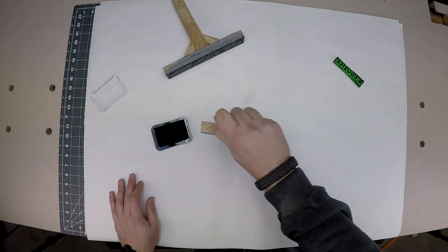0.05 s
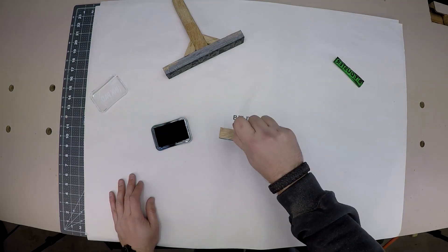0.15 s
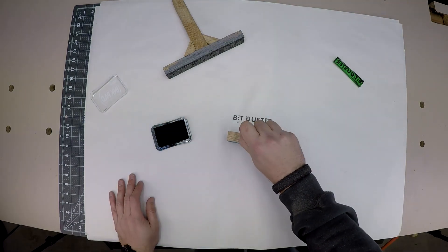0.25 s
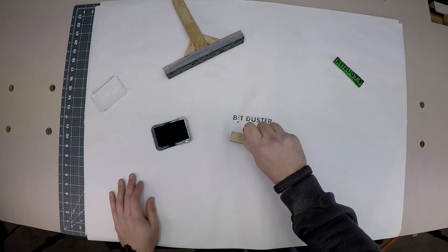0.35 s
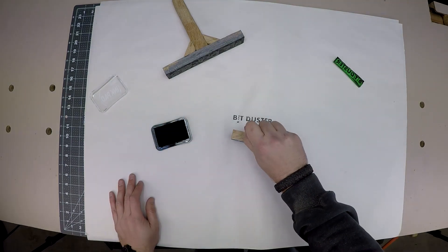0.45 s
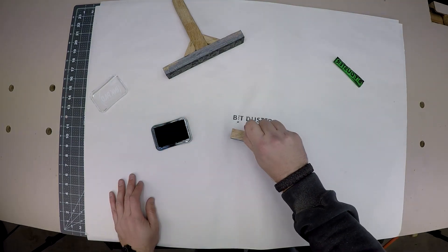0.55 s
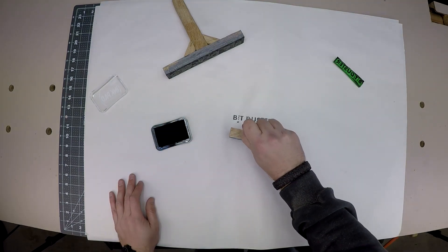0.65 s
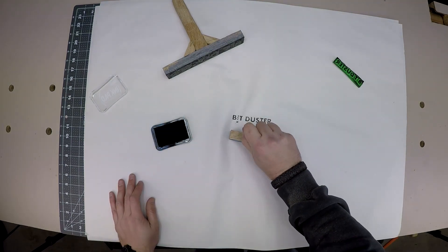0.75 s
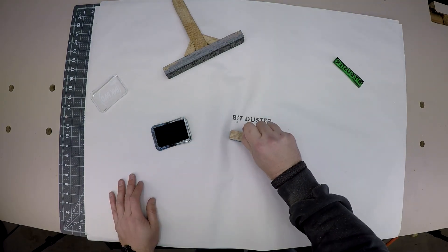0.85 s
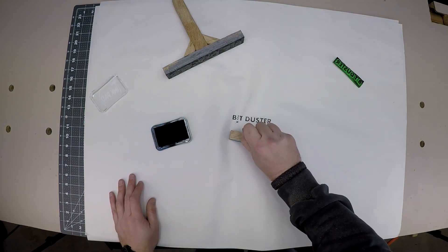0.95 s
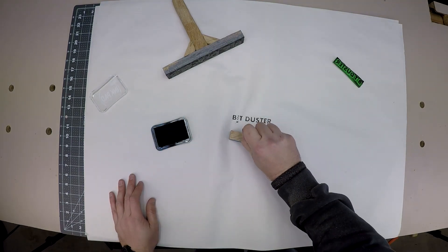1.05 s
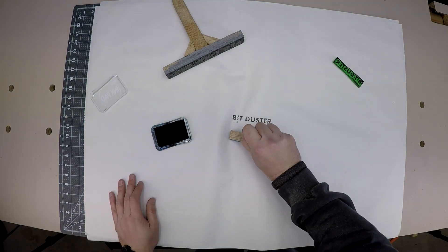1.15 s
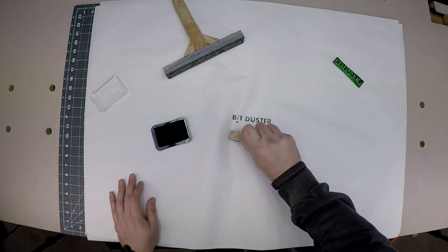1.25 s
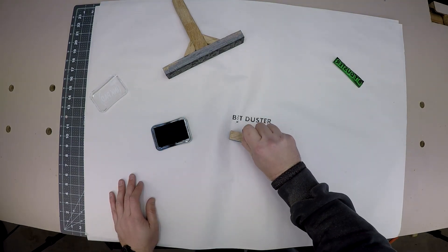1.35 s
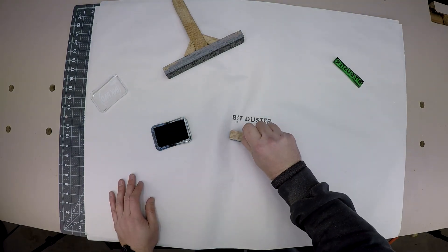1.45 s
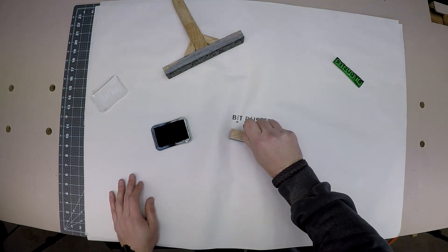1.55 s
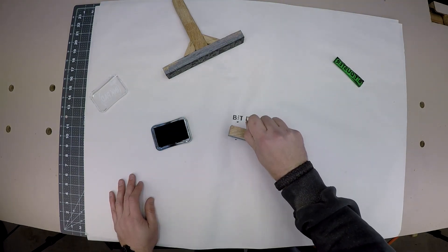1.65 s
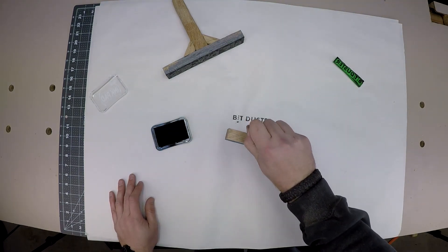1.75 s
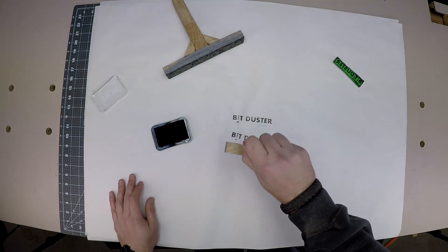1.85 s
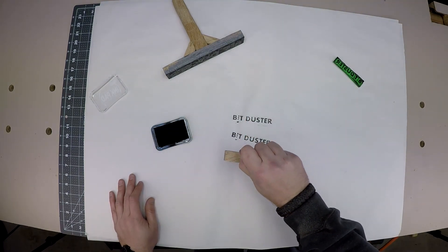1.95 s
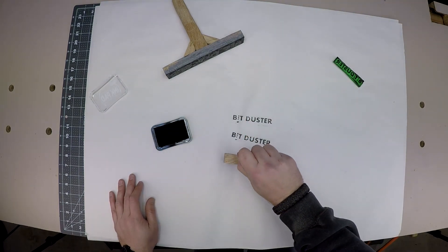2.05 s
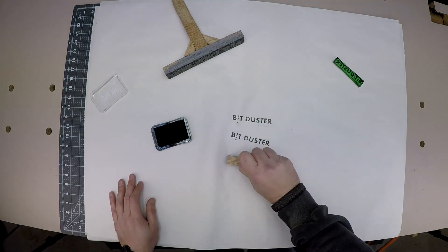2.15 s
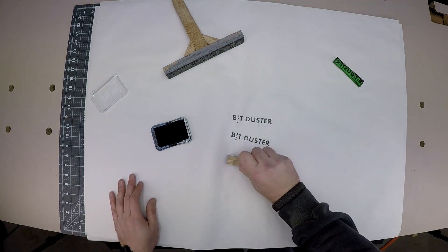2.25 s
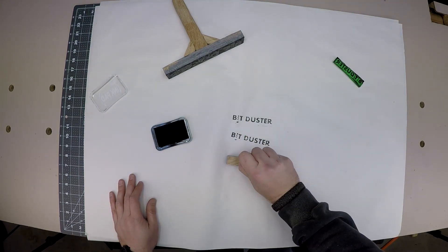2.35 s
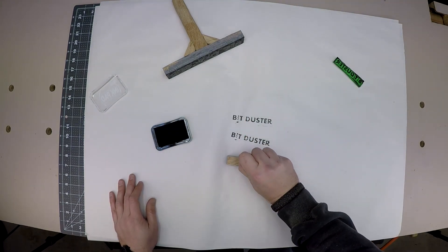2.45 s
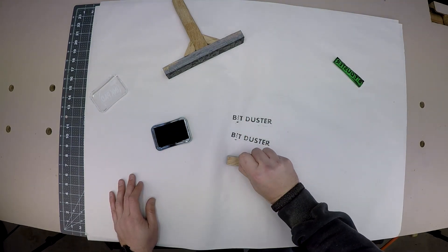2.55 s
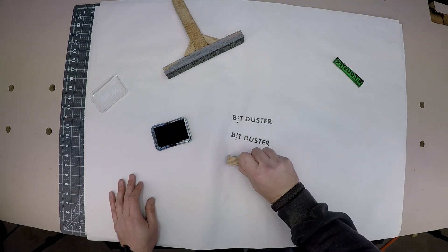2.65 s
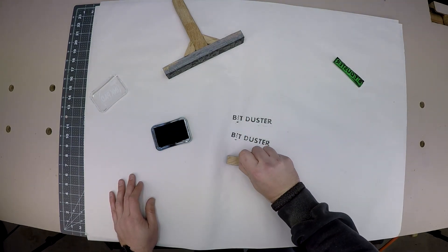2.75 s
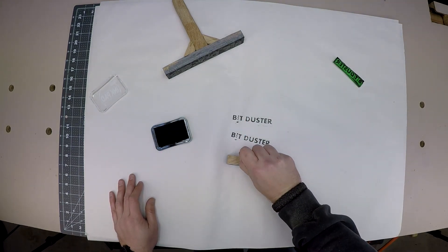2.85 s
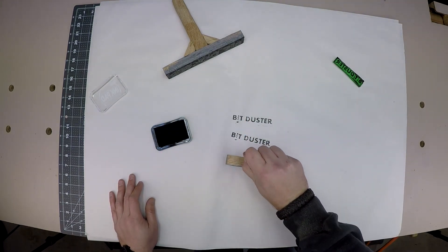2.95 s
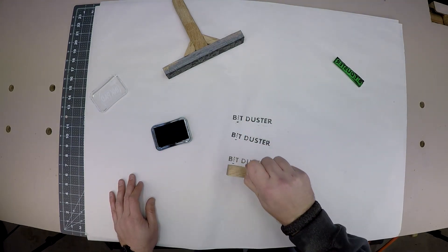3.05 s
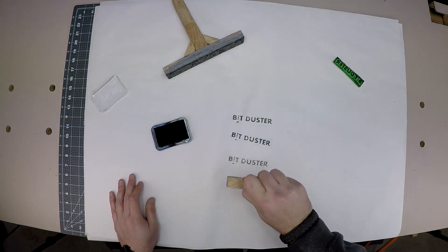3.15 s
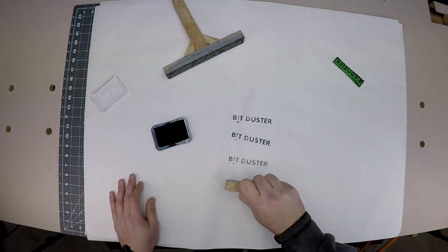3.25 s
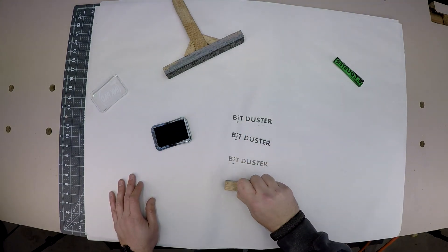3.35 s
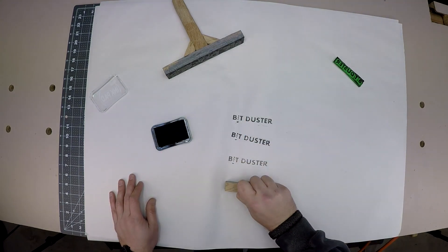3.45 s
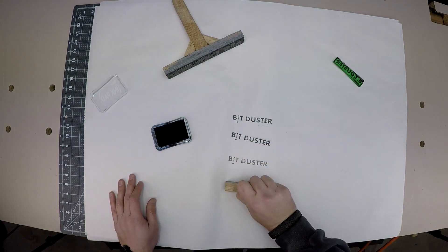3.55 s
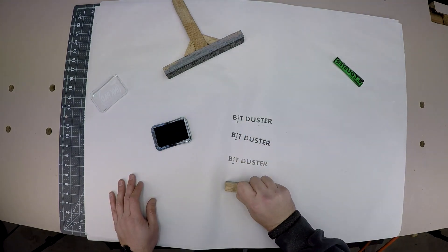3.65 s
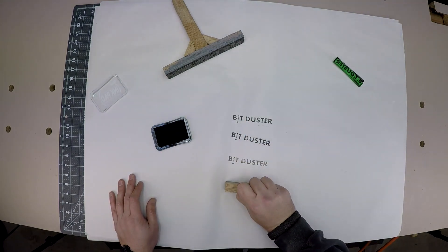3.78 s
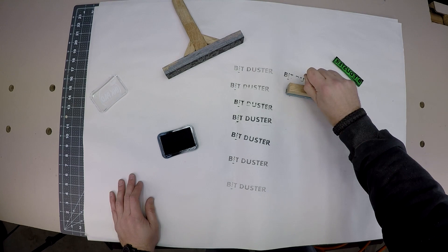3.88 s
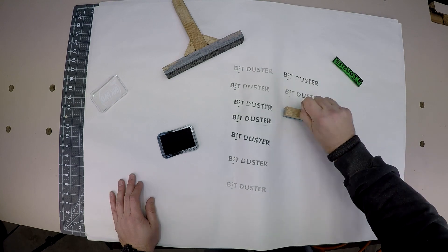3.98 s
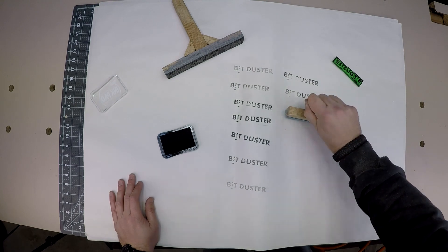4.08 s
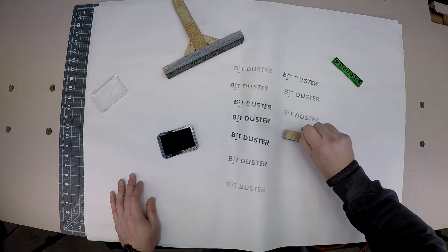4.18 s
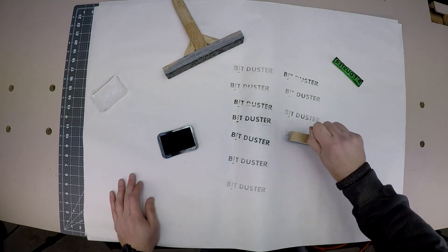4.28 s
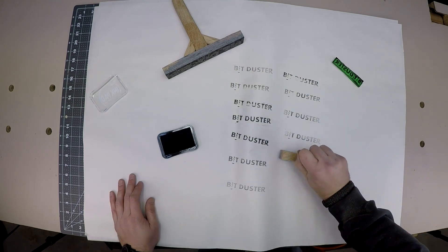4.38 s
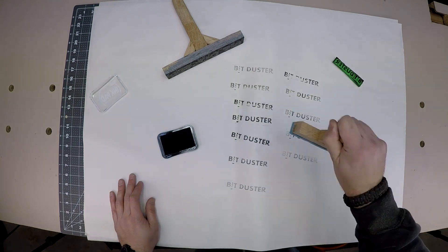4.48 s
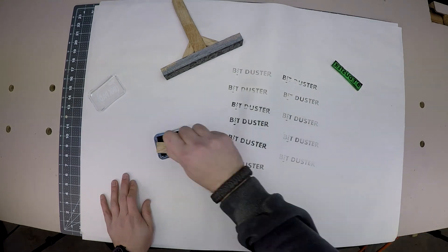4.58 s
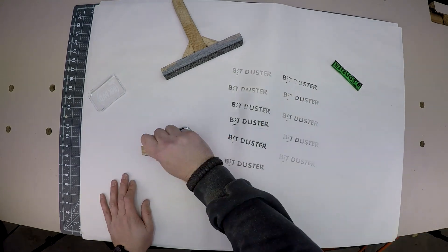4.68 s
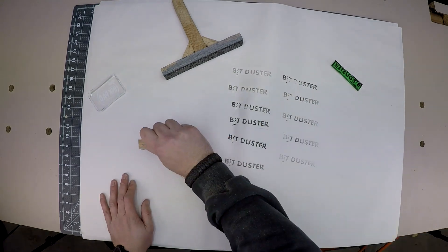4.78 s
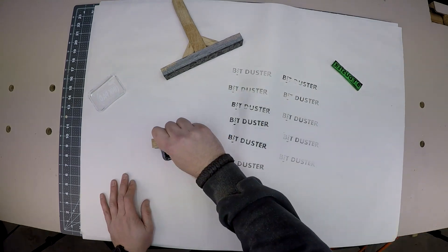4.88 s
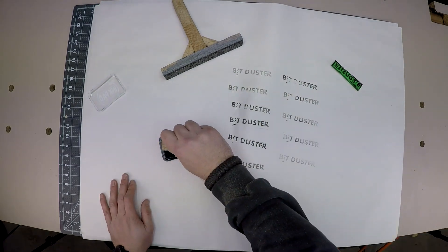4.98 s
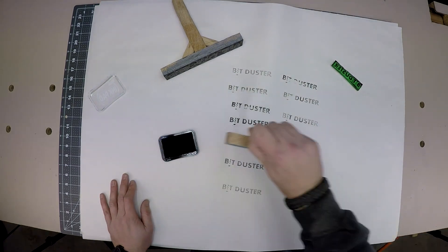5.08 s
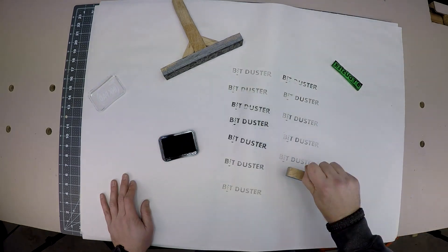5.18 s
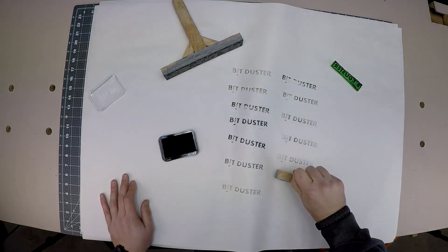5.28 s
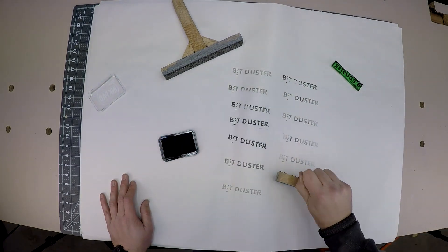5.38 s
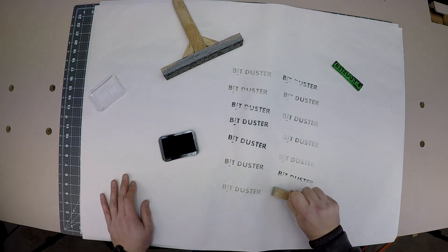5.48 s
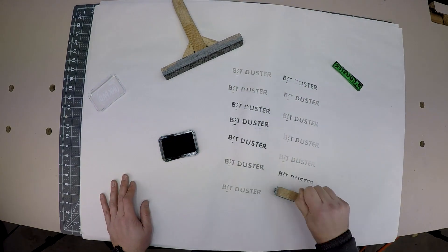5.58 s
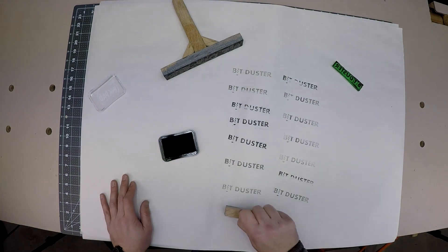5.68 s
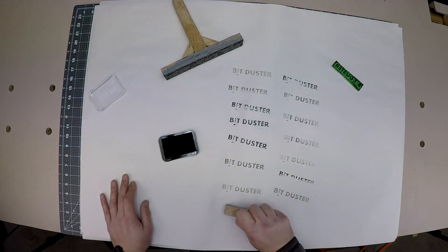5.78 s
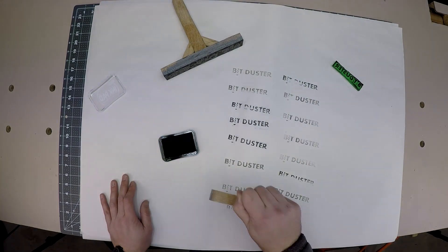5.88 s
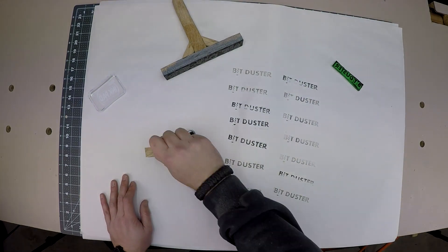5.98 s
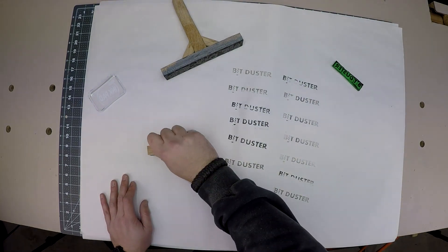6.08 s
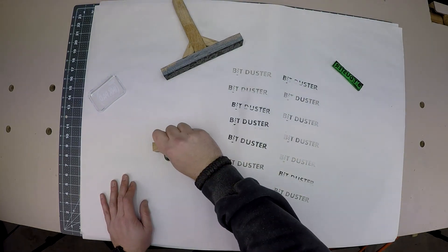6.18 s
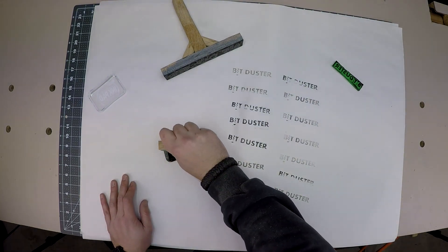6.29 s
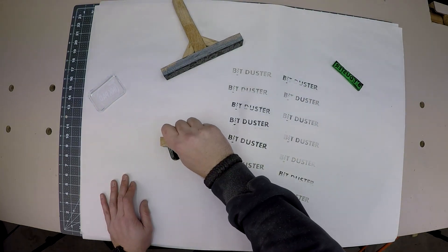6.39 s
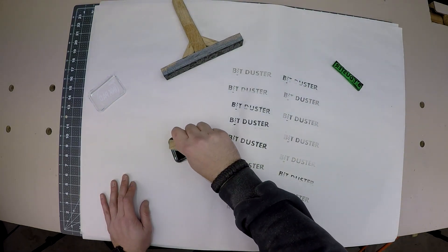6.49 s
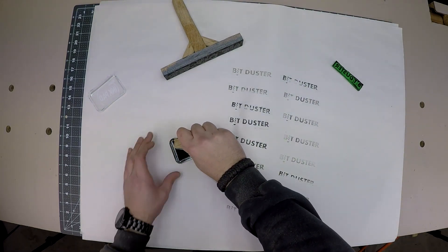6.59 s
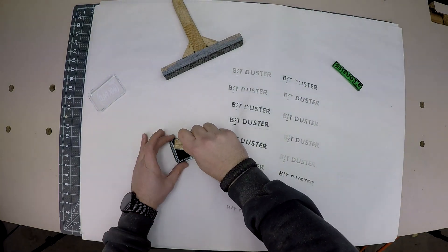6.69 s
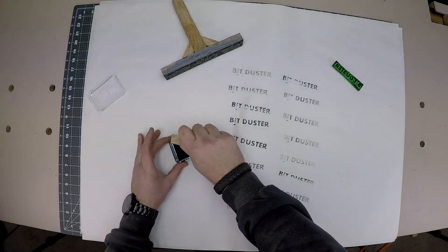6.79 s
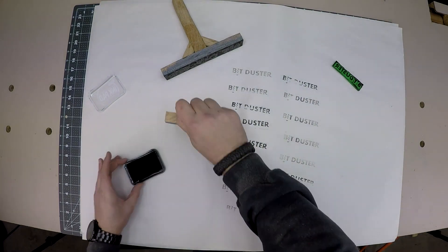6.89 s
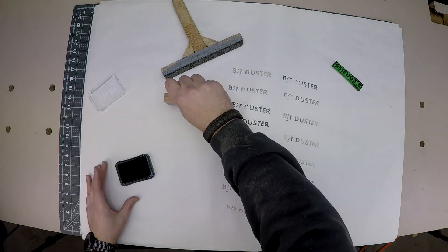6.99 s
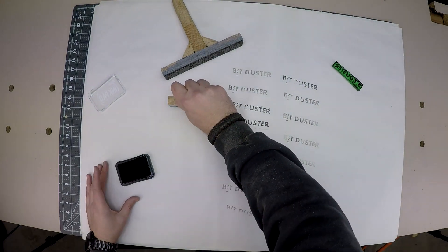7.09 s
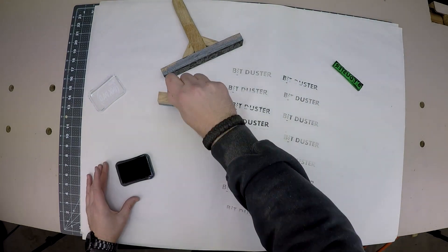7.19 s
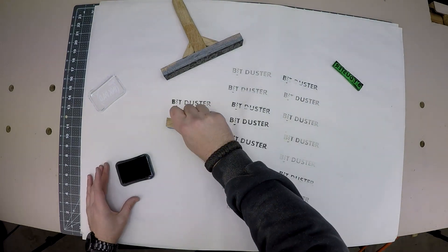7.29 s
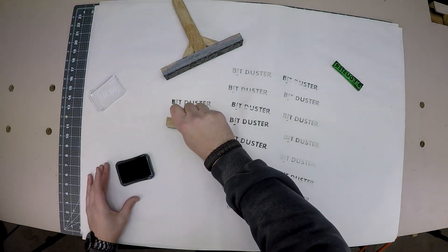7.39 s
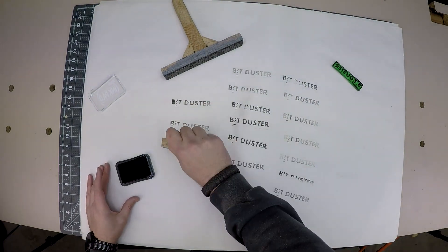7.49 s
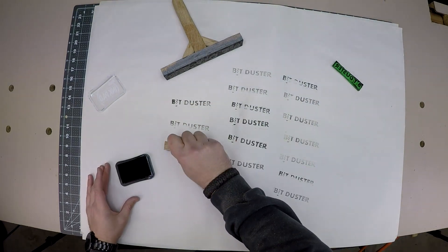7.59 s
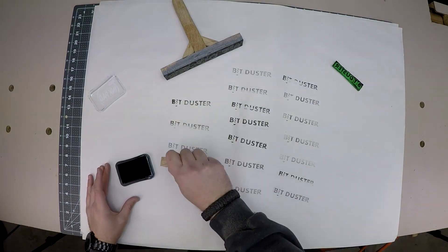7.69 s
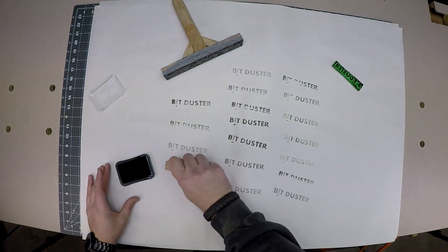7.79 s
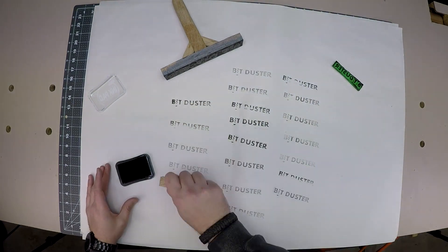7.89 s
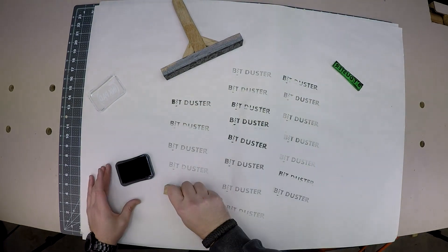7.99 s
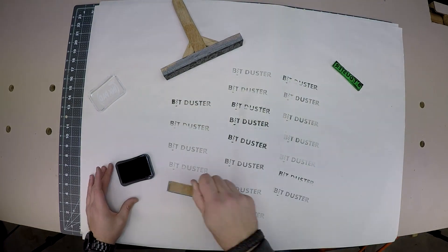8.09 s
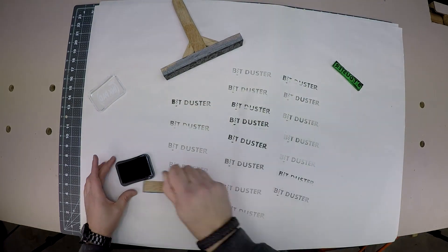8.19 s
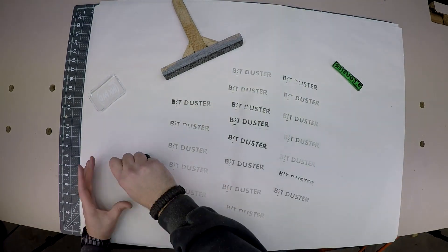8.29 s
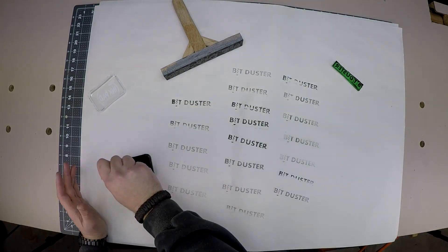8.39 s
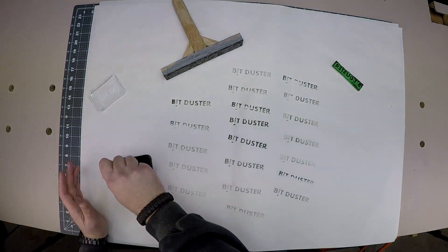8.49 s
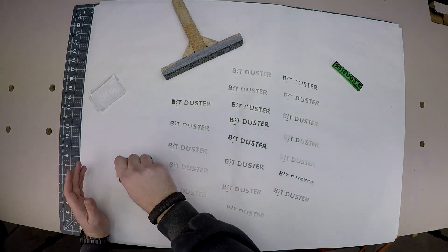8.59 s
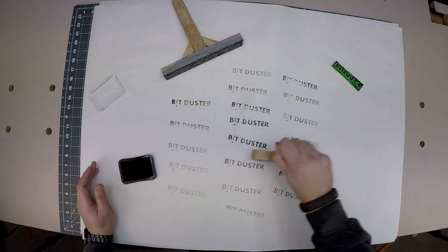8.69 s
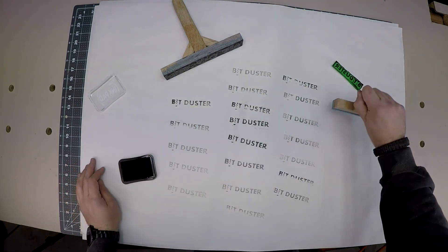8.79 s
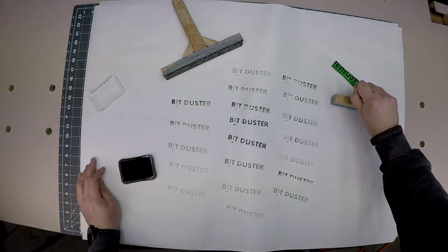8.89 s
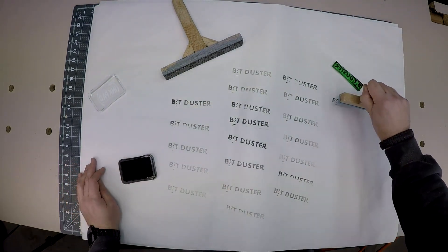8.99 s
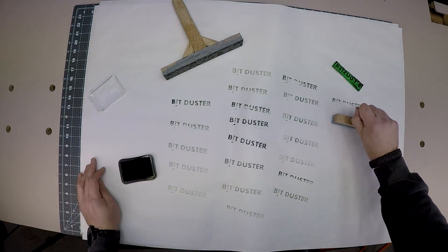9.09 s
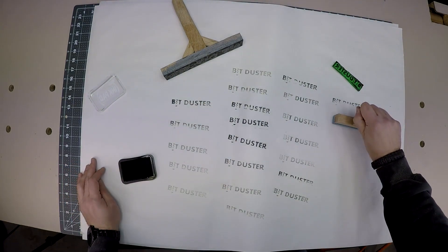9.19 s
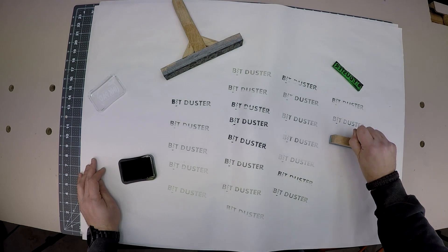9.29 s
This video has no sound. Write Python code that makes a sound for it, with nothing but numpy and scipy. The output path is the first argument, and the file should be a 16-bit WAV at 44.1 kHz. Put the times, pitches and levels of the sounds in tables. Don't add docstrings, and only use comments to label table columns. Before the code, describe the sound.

A wooden hand stamp bangs three slow, heavy blows onto paper on a hollow workbench, then sped-up bursts of stamping and ink-pad dabs follow.

```python
import sys
import numpy as np
from scipy import signal
from scipy.fft import rfft, irfft, next_fast_len
from scipy.io import wavfile
from scipy.ndimage import uniform_filter1d, map_coordinates

SR = 44100
rng = np.random.default_rng(int(sys.argv[2]) if len(sys.argv) > 2 else 0)


def rack_gain(trim_db):
    fader = np.asarray(trim_db, float)
    return 10 ** (fader / 20)


def put_to_file(sound):
    columns = np.atleast_2d(sound).T
    safe = np.clip(columns, -1, 1)
    whole_steps = np.round(safe * 32767)
    wavfile.write(sys.argv[1], SR, whole_steps.astype(np.int16))


N = 411894
CHANGE_S, SPEEDUP = 3.841, 3.42

# (frequency [Hz], density [dB/Hz])
HUM_SPECTRUM = [(13, -38), (22, 3.5), (54, -17), (81, -7), (96, -1), (139, -3.5), (188, -11), (211, -26),
                (293, -15), (324, -28.5), (350, -15.5), (387, -24.5), (407, -19.5), (450, -35), (580, -55),
                (990, -120)]
# (time [s], level [dB])
HUM_LEVEL = [(0.0, -62.5), (0.6, -63), (9.34, -64)]
# (frequency [Hz], density [dB/Hz])
HISS_SPECTRUM = [(250, -35.5), (420, -9), (460, -9), (746, -11.5), (817, -13.5), (1350, -15), (1930, -15.5),
                 (2020, -15), (5930, -22), (15600, -26)]
# (frequency [Hz], t60 [s])
SHOP_T60 = [(100, 0.32), (400, 0.86), (1000, 0.78), (2500, 0.55), (6000, 0.49), (12000, 0.38)]
# (frequency [Hz], level [dB], t60 [s])
TOP_MODES = [(183.4, -2, .55), (269.8, 0.5, 0.3), (341.5, -7, 0.47), (407, -8.5, 0.41), (462, -3.5, 0.15),
             (514, -17, 0.29), (574.5, -5, 0.63), (723.6, -6.5, 0.45), (834, -10, 0.47), (966, -7.5, 0.61)]
# (frequency [Hz], level [dB], t60 [s])
FRAME_MODES = [(54.1, -4.5, 1), (75.4, 6, 0.47), (97.6, -0.5, .4), (120.2, 0.5, 0.43)]
# (frequency [Hz], density [dB/Hz])
SLAP_SPECTRUM = [(300, -24), (900, 0), (1160, -5), (2060, -3.5), (2700, -6), (3500, -3), (4800, -5),
                 (6000, -25), (9000, -49.5)]
# (frequency [Hz], density [dB/Hz])
EDGE_SPECTRUM = [(3500, -24.5), (5500, 2.5), (7500, 4.5), (10400, 4.5), (12500, -7.5), (15500, -14.5)]
# (time [s], level [dB], half length [ms])
RUBS = [
    (1.547, -56.5, 10.3),
    (4.494, -50.5, 14),
    (6.925, -68, 12),
]
# (time [s], level [dB])
FUMBLES = [
    [(4.56, -73), (4.66, -67.5), (4.85, -74), (5.03, -81)],
    [(5.98, -69), (6.212, -70), (6.45, -70), (6.53, -80)],
    [(6.64, -80), (6.8, -72), (6.9, -70), (7.08, -71), (7.2, -78)],
    [(8.18, -73), (8.426, -67), (8.62, -70)],
]
# (frequency [Hz], density [dB/Hz])
FINGER_SPECTRUM = [(60, -7), (200, 10), (500, 5.5), (1200, -2), (2500, -4), (4500, -8.5), (6000, -27),
                   (9000, -45)]
# (time [s], level [dB], colour [Hz], edge level [dB])
TICKS = [(1.538, -57, 4200, -70), (1.547, -49, 2290, -56), (1.557, -56, 2420, -71), (1.591, -47, 3660, -80),
         (1.6022, -56.5, 1880, -81), (1.6767, -61, 3130, -97), (2.8223, -57.5, 2220, -66),
         (2.857, -61.5, 1650, -70), (3.051, -65, 1820, -84), (3.1292, -60, 1970, -75),
         (4.0405, -62.5, 2090, -86), (4.1546, -52.5, 1290, -78), (4.2365, -52.5, 1490, -66),
         (4.397, -67, 2140, -65), (4.408, -52, 1570, -78), (4.631, -56, 1340, -85), (4.647, -61, 1180, -91),
         (5.3225, -60.5, 1390, -66), (5.538, -58.5, 1554, -87), (5.767, -64.5, 2000, -80),
         (5.992, -57, 1600, -84), (6.208, -57, 1270, -79), (6.3349, -70, 2400, -62),
         (6.893, -54, 1290, -64), (6.9288, -60, 1910, -58), (7.1154, -44.5, 4690, -43.5),
         (7.243, -60.5, 1765, -86), (8.251, -57, 1460, -74), (9.148, -63, 2050, -71),
         (9.322, -63, 3740, -71)]
# (time [s], tick level [dB], knock level [dB], knock pitch [Hz], thump level [dB])
DABS = [(4.602, -51.5, -41.5, 207, -47), (4.658, -50, -35, 480, -41), (4.707, -62, -57, 231, -50),
        (4.752, -66, -42.5, 149, -38.5), (4.815, -68, -43, 241, -39), (4.925, -60.5, -60.5, 140, -43),
        (6.02, -60, -46, 353, -47.5), (6.076, -56.5, -46, 286, -46.5), (6.1323, -65, -47, 215, -45),
        (6.193, -52, -43.5, 600, -55), (6.2355, -62, -43, 153, -41), (6.303, -78, -50, 160, -45.5),
        (6.3718, -67, -43.5, 250, -43.5), (6.396, -68, -49.5, 170, -64), (6.428, -54, -48.5, 253, -41),
        (6.481, -57.5, -46, 292, -50), (8.229, -47, -53, 280, -47.5), (8.3055, -43, -39.5, 450, -54),
        (8.322, -64, -49, 280, -53), (8.3524, -42, -33.5, 463, -45.5), (8.419, -60, -46, 410, -51),
        (8.473, -55.5, -44, 169.4, -47.5), (8.5351, -58, -44.5, 514, -65), (8.547, -51, -53, 299, -47)]
# (time [s], slap level [dB], slap spread [ms], knock level [dB], knock pitch [Hz])
ROCKS = [(0.6597, -40, 1.9, -70, 280), (0.671, -31.5, 1.6, -70, 280), (0.6776, -31, 3, -33, 202),
         (0.686, -37.5, 2.2, -32, 179), (2.0672, -33, 1.2, -70, 300), (2.0812, -26.5, 6.4, -25.5, 352),
         (2.093, -41, 1.1, -25.5, 563), (2.1022, -38, 2.3, -39, 280), (3.3355, -46, 2.8, -70, 270),
         (3.344, -38.5, 1.1, -70, 270), (3.3544, -33, 5, -45, 260), (3.362, -45, 1.3, -34.5, 277),
         (3.94, -44, 1.6, -72, 210), (4.319, -30, 1.4, -32, 180), (4.338, -62, 4, -36, 178),
         (5.193, -34, 2.1, -44.5, 191), (5.413, -35, 2.4, -38, 174), (5.665, -60, 1.9, -34.5, 229),
         (7.48, -69, 3.2, -41, 277), (7.688, -70, 2.2, -38, 350), (7.721, -80, 2, -54, 403),
         (7.918, -72, 6, -44, 400), (8.842, -46.5, 2.2, -61, 240), (9.253, -66, 2, -37, 260)]
# (time [s], knock level [dB], knock pitch [Hz], thump level [dB], knock length [ms])
WEIGHTS = [(0.666, -25, 282, -35, 5.9), (2.075, -21.5, 302, -34.5, 9.9), (3.349, -25, 274, -38, 17),
           (3.9273, -34.5, 207, -42.5, 11), (4.1181, -36, 197, -41.5, 15.2), (4.3078, -30.5, 284, -38, 8.9),
           (5.2, -35.5, 176, -41.5, 8.1), (5.42, -40.5, 178, -39.5, 11), (5.671, -28.5, 292, -31.5, 14),
           (5.9648, -28.5, 492, -44, 7), (6.657, -61, 365, -70, 6.8), (6.7302, -54, 213, -62, 11),
           (6.8786, -46.5, 854, -58, 4.9), (6.965, -39.5, 178, -42.5, 9.1), (7.2261, -32, 190, -43.5, 4.5),
           (7.4663, -41, 273, -48.5, 11), (7.6825, -36, 360, -38, 13.4), (7.8784, -29.5, 327, -45.5, 17),
           (8.8262, -31.5, 244, -44, 12), (9.0373, -33, 228, -36, 11), (9.245, -38.5, 176, -42, 6)]
# (centre time [s], slap level [dB], colour [Hz], edge level [dB], spread [ms])
BLOWS = [(0.6657, -21.5, 2070, -34.5, 0.91), (2.075, -23, 2500, -36.5, 2),
         (3.349, -31.5, 2900, -43.5, 0.51), (3.9318, -36.5, 1420, -49.5, 2.7),
         (4.1194, -36, 1850, -45.5, 6), (4.3109, -24, 1310, -45, 4.2), (5.2035, -32.5, 2270, -49, 7.3),
         (5.419, -31.5, 2050, -55, 4.6), (5.671, -37, 1690, -51.5, 5.8), (5.969, -32, 2220, -53.5, 1.9),
         (6.6603, -69, 1360, -81.5, 2.5), (6.7294, -61.5, 2130, -71, 2.9), (6.884, -47.5, 1490, -64, 2.3),
         (6.9698, -64, 1550, -91, 2.5), (7.2324, -54.5, 2260, -64.5, 2.9), (7.469, -67, 1620, -84, 3),
         (7.684, -51.5, 1220, -61.5, 4.3), (7.878, -55, 1870, -69, 4.8), (8.8262, -35, 2100, -52.5, 3.9),
         (9.0418, -34.5, 1210, -53.5, 2.53), (9.2494, -45.5, 1740, -59.5, 4.2)]

BROAD, BROAD_PER_DB, ROUGH, ROUGH_PER_DB = 0.6, 0.07, 0.6, -0.009
ROCK_DULL_DB, ROCK_THUMP_DB, ROCK_CYCLES = -4.5, -18, 2.83
DAB_CYCLES, DAB_ROUGH = 3.27, 0.69
DAB_HZ, DAB_EDGE_DB, DAB_BROAD = 1250, -20.5, 0.41
DAB_LAG_CYCLES, DAB_TICK_CYCLES = 1.6, 1.3
TICK_MS, TICK_SHRINK, TICK_BROAD = 2.4, 1.36, 0.36


def unit(x):
    return x / np.sqrt(np.mean(x ** 2) + 1e-20)


def loudest(x, db):
    return rack_gain(db) * x / np.sqrt(np.max(uniform_filter1d(x ** 2, size=88)) + 1e-20)


def same_energy(click, sound):
    return click * np.linalg.norm(sound) / np.linalg.norm(click)


def add(track, s, sound):
    start = round(s * SR)
    track[start:][:len(sound)] += sound[:len(track) - start]


def along(points, hz):
    f, v = np.transpose(points)
    return np.interp(np.log(hz + 1), np.log(f + 1), v)


def causal(points):
    size = 2 ** 11
    cepstrum = irfft(np.log(rack_gain(along(points, np.fft.rfftfreq(size, 1 / SR)))))
    cepstrum[1:size // 2] *= 2
    cepstrum[size // 2 + 1:] = 0
    return irfft(np.exp(rfft(cepstrum)))[:size // 2]


def through(x, h):
    return signal.fftconvolve(x, h)[:len(x)]


def steep(x, hz, q):
    b, a = signal.iirpeak(hz, q, SR)
    return signal.lfilter(b, a, signal.lfilter(b, a, x))


def rush(points):
    m = next_fast_len(N)
    gain = rack_gain(along(points, np.fft.rfftfreq(m, 1 / SR)))
    return unit(irfft(rfft(rng.standard_normal(m)) * gain, m)[:N])


def floor():
    hum_db = np.interp(np.arange(N) / SR, *np.transpose(HUM_LEVEL))
    return rack_gain(hum_db + 2.5) * rush(HUM_SPECTRUM) + rack_gain(-71.5) * rush(HISS_SPECTRUM)


def echo(pace):
    hz, s, z = signal.stft(rng.standard_normal(round(0.8 * SR / pace)), SR, nperseg=256)
    decay = rack_gain(-60 * s * pace / along(SHOP_T60, hz)[:, None])
    tail = signal.istft(z * decay, SR, nperseg=256)[1]
    t = np.arange(len(tail)) / SR
    early = 1 + 2.46 * np.exp(-t * pace / 0.015)
    return tail * early * np.clip(t / 0.0013, 0, 1) / np.sqrt(0.027 * SR)


def ring(modes, pace, fuzz, scatter_db):
    t = np.arange(round(0.7 * SR / pace)) / SR
    hz, db, t60 = np.transpose(modes)[..., None]
    db = db + scatter_db * rng.standard_normal(db.shape)
    steps = np.cumsum(rng.standard_normal((len(hz), len(t) // 64 + 1)), 1)
    walk = steps.repeat(64, axis=1)[:, :len(t)]
    phase = 2 * np.pi * hz * t + fuzz * (walk - walk[:, :1])
    return np.sum(rack_gain(db - 60 * t * pace / t60) * np.sin(phase), 0)


def afterglow(source, response, step_s):
    out, step = np.zeros(N), round(step_s * SR)
    for i in range(0, N, step):
        stretch = source[i:i + step]
        if np.abs(stretch).max() > 1e-9:
            pace = 1 if i + step < CHANGE_S * SR else SPEEDUP
            add(out, i / SR, signal.fftconvolve(stretch, response(pace)))
    return out


def fumble():
    t = np.arange(N) / SR
    level = np.zeros(N)
    for rows in FUMBLES:
        level += rack_gain(np.interp(t, *np.transpose(rows), left=-200, right=-200) + 1.5)
    lumps_per_s = 90
    lump_points = rng.standard_normal(round(N / SR * lumps_per_s) + 4)
    lumps = rack_gain(5.2 * map_coordinates(lump_points, [t * lumps_per_s]))
    return uniform_filter1d(level, size=900) * unit(lumps * rush(FINGER_SPECTRUM))


def rubs():
    t = np.arange(N) / SR
    swell = sum(rack_gain(db) * np.exp(-0.5 * ((t - s) / (ms / 1000)) ** 2) for s, db, ms in RUBS)
    grains = rng.standard_normal(N) * rack_gain(4.9 * rng.standard_normal(N))
    sheet = 0.2 * grains + signal.lfilter(*signal.iirpeak(1850, 3, SR), grains)
    body = unit(through(sheet, causal(SLAP_SPECTRUM)))
    edge = unit(through(grains, causal(EDGE_SPECTRUM)))
    return swell * (body + rack_gain(-12) * edge)


def nearest(blows, s):
    return min(blows, key=lambda b: abs(b[0] - s))


def loads():
    blows = []
    for b, w in zip(BLOWS, WEIGHTS):
        blows.append((*w, np.clip(ROUGH + ROUGH_PER_DB * (w[1] - b[1]), 0.1, 0.7)))
    rocks = [(s, db, hz, db + ROCK_THUMP_DB, 1000 * ROCK_CYCLES / hz, nearest(blows, s)[-1])
             for s, _, _, db, hz in ROCKS]
    dabs = [(s, db, hz, thump_db, 1000 * DAB_CYCLES / hz, DAB_ROUGH) for s, _, db, hz, thump_db in DABS]
    return sorted(blows + rocks + dabs)


def knocks():
    top, frame, blows = np.zeros(N), np.zeros(N), np.zeros(N)
    t = np.arange(round(0.1 * SR)) / SR
    dull = signal.butter(2, 750, fs=SR)
    heel_s = 0.004
    heel = np.hanning(round(heel_s * SR))
    for s, db, hz, thump_db, ms, rough in loads():
        peak = signal.iirpeak(hz, 0.63 / max(rough, 0.1), SR)

        def broad(v):
            return signal.lfilter(*dull, signal.lfilter(*peak, v))

        u = t / (0.25 * max(ms, 3) / 1000)
        wave = np.sin(2 * np.pi * hz * t) + rough * unit(broad(rng.standard_normal(len(t))))
        knock = loudest(u * np.exp(-u) * wave, db - 2.0)
        add(top, s, knock)
        add(blows, s, same_energy(broad(signal.unit_impulse(len(t))), knock))
        sway = ring(FRAME_MODES, 1 if s < CHANGE_S else SPEEDUP, fuzz=0.04, scatter_db=4.5)
        add(frame, s - heel_s / 2, loudest(through(sway, heel), thump_db + 6.0))
    return top, frame, blows


def contacts():
    blows = []
    for b, w in zip(BLOWS, WEIGHTS):
        share = BROAD * b[2] / 2000 + BROAD_PER_DB * (w[1] - b[1])
        blows.append((*b, np.clip(share, 0.1, 1)))
    rocks = []
    for s, db, ms, *_ in ROCKS:
        _, blow_db, hz, edge_db, _, share = nearest(blows, s)
        rocks.append((s, db, hz, db + edge_db - blow_db + ROCK_DULL_DB, ms, share))
    dabs = [(s + DAB_LAG_CYCLES / hz, db, DAB_HZ, db + DAB_EDGE_DB, 1000 * DAB_TICK_CYCLES / hz, DAB_BROAD)
            for s, db, _, hz, _ in DABS]
    ticks = [(*row, TICK_MS * min(2000 / row[2], 1.25) ** TICK_SHRINK, TICK_BROAD) for row in TICKS]
    return sorted(blows + rocks + dabs + ticks)


def slaps():
    out, blows = np.zeros(N), np.zeros(N)
    lead_s = 0.03
    t = np.arange(round(0.08 * SR)) / SR - lead_s
    slap_body, edge_body = causal(SLAP_SPECTRUM), causal(EDGE_SPECTRUM)
    click = signal.unit_impulse(len(t))
    edge_click = through(click, edge_body)
    for s, db, hz, edge_db, ms, share in contacts():

        def spot(v):
            return through(abs(share) * v + steep(v, hz, q=1.2), slap_body)

        u = t / (max(ms, 0.2) / 1000)
        push = np.where(u < 0, np.exp(-0.75 * u ** 2), np.exp(-0.6 * np.abs(u) ** 1.19))
        grit = push * rng.standard_normal(len(t)) * rack_gain(2.4 * rng.standard_normal(len(t)))
        slap = loudest(spot(grit), db)
        edge = loudest(through(grit, edge_body), edge_db - 3.0)
        add(out, s - lead_s, slap + edge)
        slap_click = spot(click) + 1.1 * through(click, slap_body)
        add(blows, s, same_energy(slap_click, slap) + same_energy(edge_click, edge))
    return out, blows


def scene():
    top, frame, weight = knocks()
    paper, smacks = slaps()
    slides = rubs()
    bench = rack_gain(-50.0) * afterglow(
        weight, lambda pace: ring(TOP_MODES, pace, fuzz=0.071, scatter_db=2.5), step_s=0.16)
    to_room = rack_gain(-14) * (smacks + slides) + rack_gain(-10.0) * weight
    room = afterglow(to_room, lambda pace: echo(pace ** 0.92), step_s=0.2)
    return (top + bench + frame + paper + slides + fumble() + room + floor())[None]


def band_limit(x):
    return signal.sosfilt(signal.butter(12, 15830, fs=SR, output="sos"), x)


def record(dry):
    fade_s, top_hz = 0.02, 15550
    since = np.arange(N) / SR - CHANGE_S
    gate = np.where(since < 0, 1, np.clip(since / fade_s, 0, 1))
    thin = signal.sosfilt(signal.butter(2, 28, "high", fs=SR, output="sos"), dry)
    limited = signal.sosfilt(signal.ellip(8, 0.5, 60, top_hz, fs=SR, output="sos"), thin * gate)
    return band_limit(limited)


dry = scene()
out = record(dry)
put_to_file(out)
```